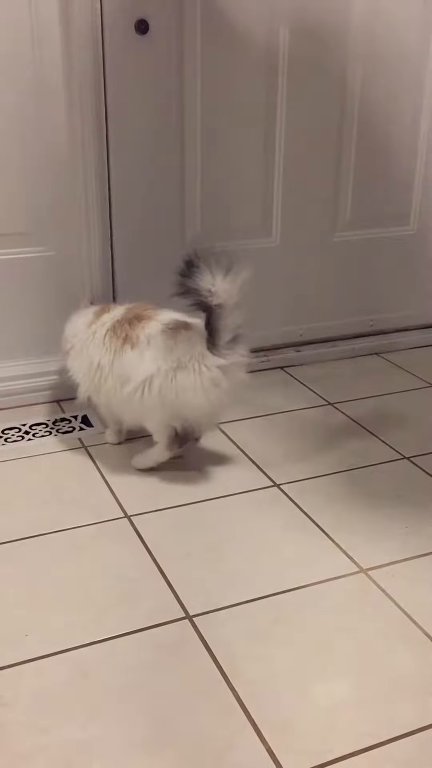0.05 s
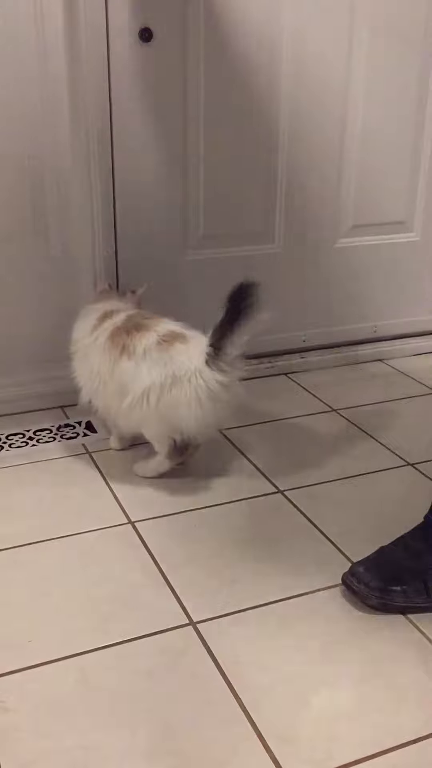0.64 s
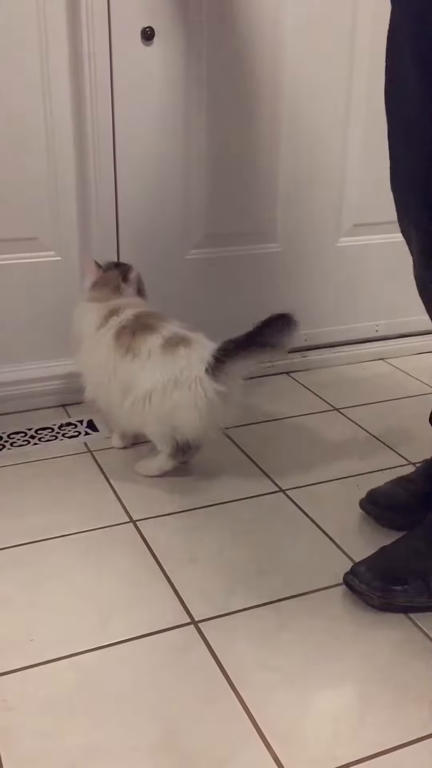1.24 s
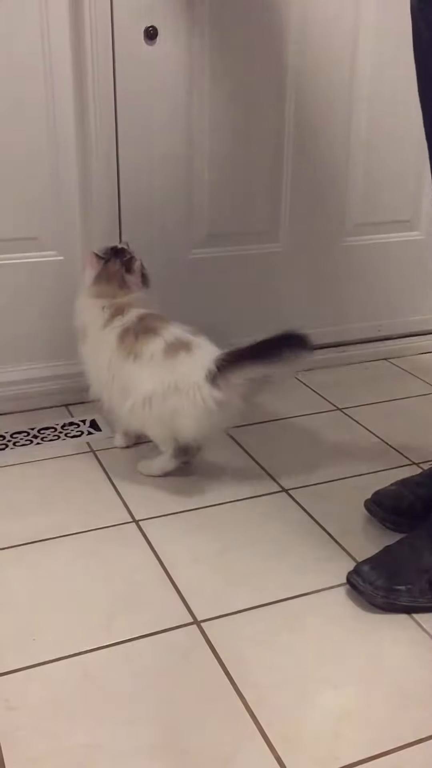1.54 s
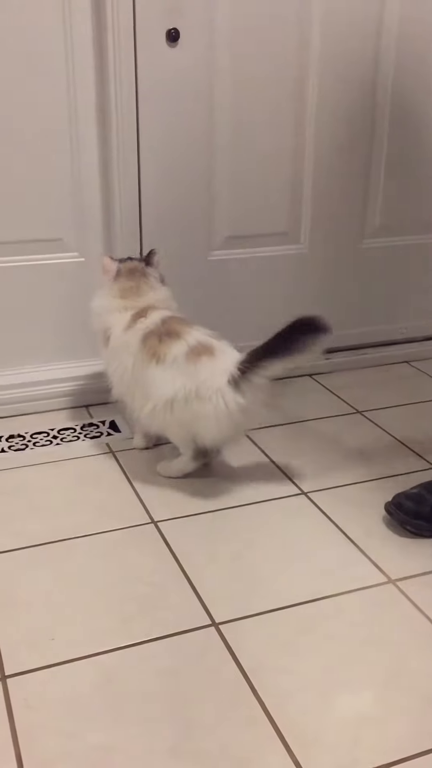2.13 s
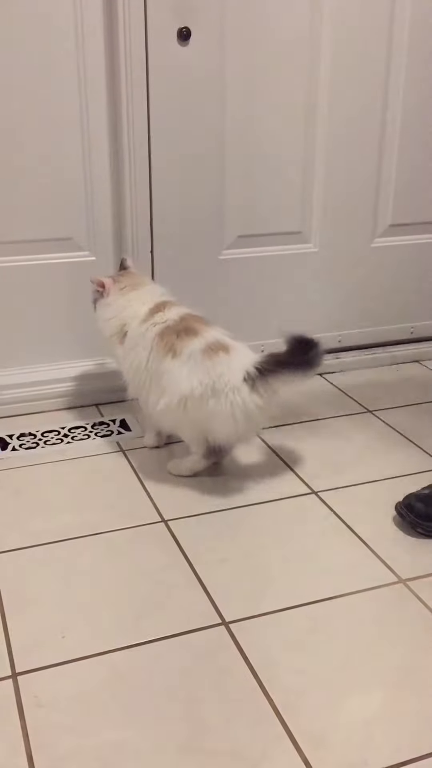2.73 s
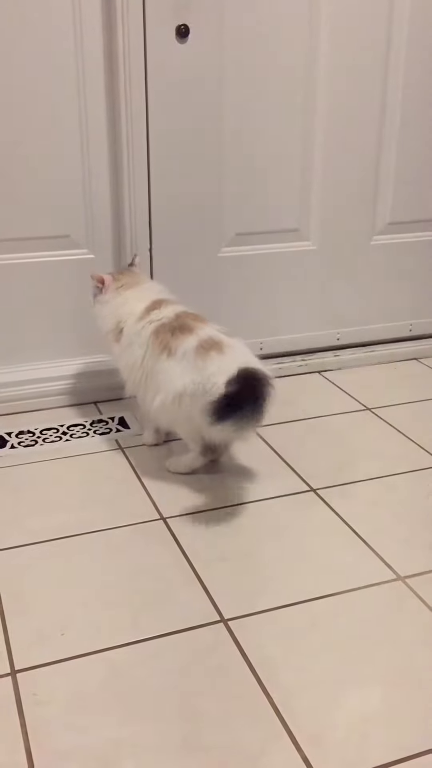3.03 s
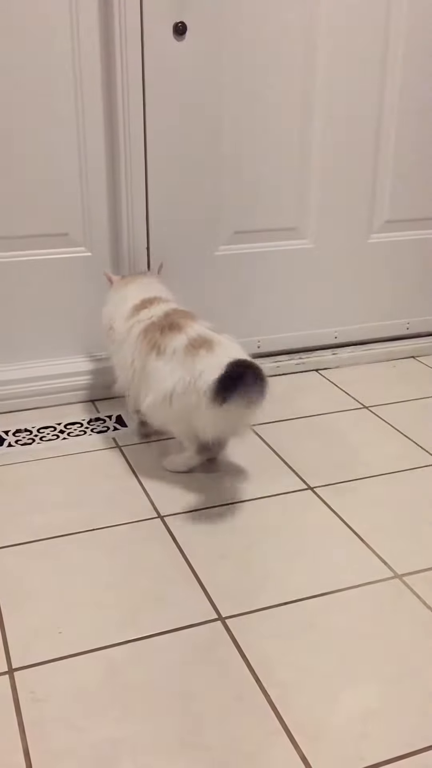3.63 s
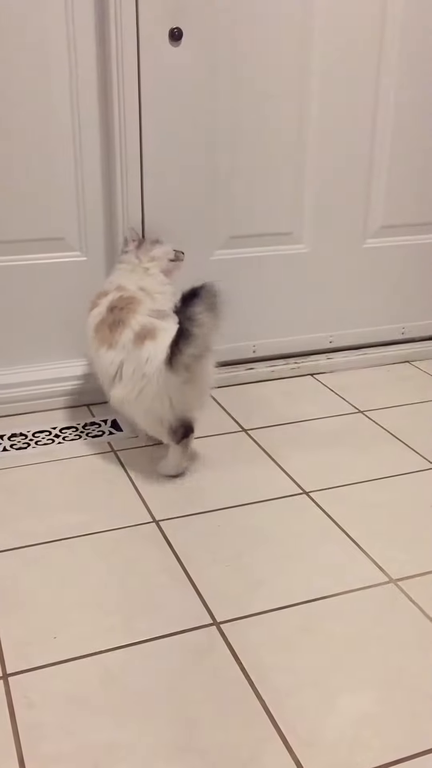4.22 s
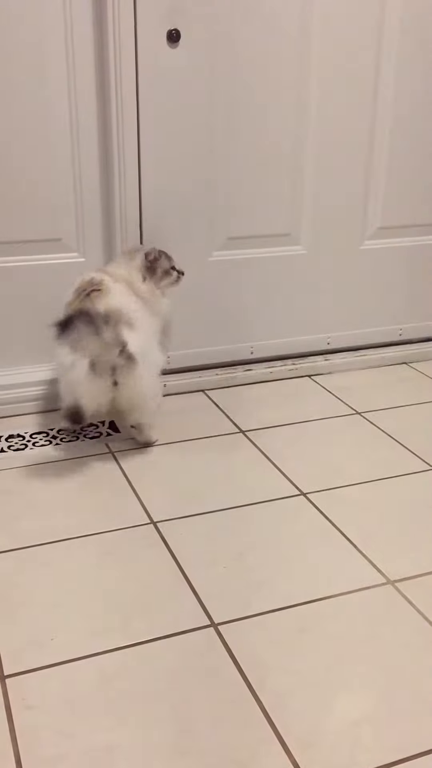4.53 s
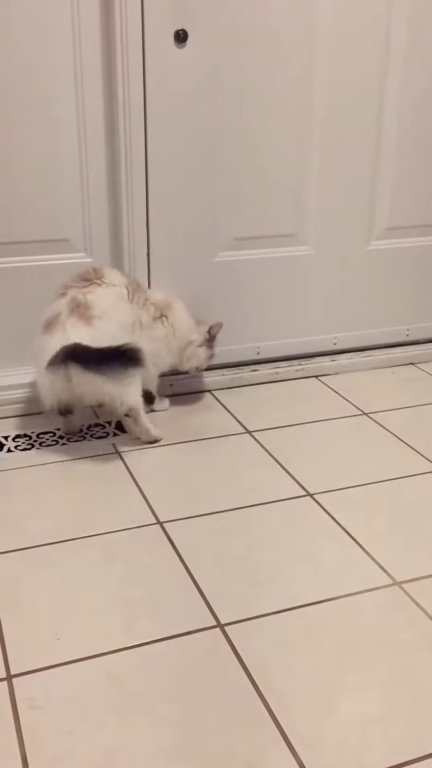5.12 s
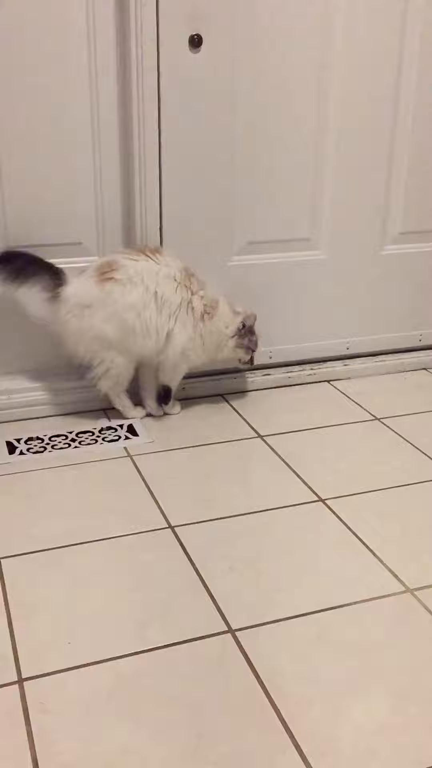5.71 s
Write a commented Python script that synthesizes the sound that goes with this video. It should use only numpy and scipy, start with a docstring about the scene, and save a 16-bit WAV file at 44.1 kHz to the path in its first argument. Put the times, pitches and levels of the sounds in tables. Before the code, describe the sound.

A wooden house door bangs hard in its frame with a low boom, followed by a few lighter knocks and a faint rub and squeak of its seal. The door knocks dully once, then the metal latch rattles and catches. After a short pause, shoes take soft, uneven steps on tile, with light scuffs and a brief rustle. It is heard from one spot in a hallway with a short echo and faint hiss.

```python
"""A door bangs in a tiled hallway

A house door bangs in its frame: the wood rings, the whole door booms, and its seal rubs and squeaks.
The door knocks dully once; its metal latch rattles and catches. Shoes step over the floor, heel then
toe, with soft scuffs and a brief rustle. Each knock echoes off the hard walls, over a faint room hiss."""
import sys
import numpy as np
from scipy import signal
from scipy.fft import rfft, irfft, next_fast_len
from scipy.io import wavfile

SR = 44100
rng = np.random.default_rng(int(sys.argv[2]) if len(sys.argv) > 2 else 0)


def to_wav(sig):
    """Store sig (one row per channel, or 1-D mono) as 16-bit WAV at the path in sys.argv[1].

    Samples outside -1..1 are clipped; the rate is SR.
    """
    pcm = np.clip(np.atleast_2d(sig), -1, 1) * 32767
    pcm = np.round(pcm).astype(np.int16)
    wavfile.write(sys.argv[1], SR, pcm.T)  # frames by channels


N = 254368
T = np.arange(SR * 3 // 4) / SR  # the time axis of one knock [s]

# Levels in the tables are relative: each source adds its own gain.
# The door hitting its frame, then the latch hitting its plate: (time [s], knock [dB], thud [dB],
# brightness [dB], thud pitch [Hz], clack pitch [Hz], chatter time [s])
FRAME_HITS = [(.212, -40, -28, -11.5, 164, 730, 0.048), (.2355, -28.5, -45, 3.5, 150, 1336, 0.063),
              (.2425, -26, -22.5, 4.5, 73, 1313, .018), (.2465, -22, -31, -0.5, 85.4, 1398, 0.014),
              (.44, -51, -44, -1, 81.6, 1226, 0.048), (.481, -55.5, -34.5, 4, 76, 1320, 0.04),
              (.603, -44, -48, -8.5, 142, 1300, 0.11), (.645, -47.5, -34, -8, 346, 870, 0.04),
              (.678, -72, -32.5, 4, 290, 920, 0.039), (.73, -67, -39, -5, 370, 1750, 0.074),
              (.745, -58.5, -44, -1, 142, 1770, .05), (.76, -58, -39, -8, 305, 1660, 0.025)]
LATCH_HITS = [(.633, -47, -40.5, 2.5, 312, 6990, 0.031), (1.3642, -45.5, -50, -2, 170, 1800, 0.0017),
              (1.367, -43, -45.5, -9, 378, 880, 0.0078), (1.377, -50.5, -68, -2.5, 92, 950, .004),
              (1.482, -53.5, -50.5, -11, 131, 1730, 0.1), (1.521, -48.5, -64, -2.5, 130, 1410, 0.13),
              (1.64, -43.5, -45, 0.5, 151, 5180, 0.064), (1.6605, -33, -31, 1, 184, 1027, .04),
              (1.675, -31, -35.5, 0.5, 211, 1380, 0.0392), (1.836, -45, -70, 0, 240, 1390, 0.057)]
# Hard shoves of the door: (time [s], level [dB])
SHOVES = [(0.254, -5.5), (0.439, -24.5), (0.733, -29.5)]
# The low tones of the whole door bending: (pitch [Hz], level [dB], swell time [s])
BENDING_TONES = [(82, -21.5, 0.027), (52, -28, 0.017), (170.4, -31.5, 0.015)]
# The ringing tones of the door and of the floor: (pitch [Hz], level [dB], time to fade 60 dB [s])
DOOR_TONES = [(290, -2.5, 0.69), (546, 2, 0.31), (937, 10, 0.2), (1090, -1.5, 0.18), (1240, -11, .26),
              (1319, 3.5, .27), (1487, 6.5, 0.24), (1430, -2.5, 0.29), (1613, 9.5, 0.12), (1664, -5.5, 0.4),
              (2320, -8.5, .25), (2350, -11, 0.32), (3680, -7.5, 0.1623), (3920, -10, 0.2),
              (4710, -10.5, 0.15)]
FLOOR_TONES = [(248.6, -11.5, 0.097), (320, -4, 0.219), (384.3, -1.5, 0.12), (573, -18, 0.29)]
# Footsteps, and one dull, step-like knock of the door at 1.34 s: (time [s], thump [dB],
# thump pitch [Hz], sole [dB], heel [dB], treble limit [Hz], rise time [s], toe gain [dB])
STEPS_AND_DOOR_KNOCK = [(.058, -50.5, 86.5, -55.5, -52.5, 1210, 0.0072, -24),
                        (1.3381, -38.5, 124, -44.5, -38, 2230, 0.00018, -16),
                        (2.732, -40, 172, -42, -55, 1450, 0.00095, -10),
                        (2.8507, -45.5, 149, -44.5, -44, 2000, 0.00024, -14.5),
                        (3.035, -59, 86, -74.5, -64, 2980, 0.0098, -14),
                        (3.442, -41.5, 161, -47, -53, 2900, 0.000064, -10),
                        (3.683, -38.5, 141, -43, -52.5, 1600, 0.00016, -5),
                        (3.85, -46, 136, -46, -52, 2050, 0.00056, -21),
                        (3.952, -35, 166, -59, -77, 600, 0.0053, -9.5),
                        (4.033, -33, 167.6, -40, -53, 1710, .0002, -7.5),
                        (4.5365, -47.5, 124, -37.5, -48.5, 2940, 0.0011, -17.5),
                        (4.83, -58, 140, -61.5, -67, 1610, 0.0034, -18),
                        (5.034, -50, 114, -44, -55.5, 1395, .00012, -19),
                        (5.686, -48, 171, -67, -84, 600, .004, -24)]
# Rubbing strokes: (start [s], length [s], level [dB])
SEAL_SLIDES = [(.02, 0.11, -61.5), (.15, 0.072, -58.5), (.235, 0.23, -45), (.625, 0.026, -50.5),
               (.87, 0.17, -68.5), (1.44, 0.19, -60.5), (1.63, 0.14, -51)]
SEAL_SQUEAKS = [(.612, 0.043, -49.5), (.742, 0.0087, -58), (1.49, .02, -55), (1.59, 0.068, -53),
                (1.845, 0.064, -51.5)]
SCUFFS = [(1.585, .05, -60), (2.86, .17, -71.5), (3.065, 0.0088, -68.5), (3.447, 0.018, -64.5),
          (3.53, 0.17, -73), (3.68, 0.3, -70), (3.99, 0.11, -68), (4.11, 0.04, -63.5),
          (4.3, 0.42, -75.5), (4.59, .015, -59.5), (4.68, 0.01, -66.5), (4.745, 0.062, -73.5),
          (4.92, 0.16, -77), (5.355, 0.019, -76), (5.5, 0.086, -70)]
CLOTH_BRUSHES = [(4.68, 0.017, -62.5), (4.75, 0.043, -66), (4.845, .015, -71.5)]
# The tone colour of each material and of the room: (frequency [Hz], level [dB])
WOOD_COLOUR = [(59, -23.5), (100, -9), (264, -15), (530, -18), (680, -21), (800, -30.5), (950, -22),
               (1400, -13), (1700, -19), (2100, -22), (3100, -30.5), (3800, -25.5), (4900, -31.5),
               (7000, -33), (15500, -53)]
METAL_COLOUR = [(47, -32), (90, 1), (190, -2.5), (400, -17), (650, -7), (950, -2), (1650, 2), (2200, -8),
                (3200, -10), (4600, -11), (6300, -7.5), (7300, -16.5), (15500, -15.5)]
FLOOR_COLOUR = [(35, -28.5), (60, 0.5), (110, -0.5), (170, 5.5), (245, -1), (335, 3.5), (480, -8.5),
                (590, -3), (760, -9), (960, -11), (1800, -19), (3000, -25.5), (9000, -26)]
SEAL_COLOUR = [(88, -39.5), (150, -5.5), (395, 5.5), (782, -5), (928, 0.5), (1490, -6), (1640, -11.5),
               (1980, -5.5), (4400, -16), (7340, -23.5), (14000, -41)]
SOLE_COLOUR = [(290, -28), (500, -8), (997, -4.5), (1090, -6), (1170, -3), (1530, -4.5), (1800, -3),
               (15500, -25)]
CLOTH_COLOUR = [(1500, -20), (4000, -8), (7000, -1.5), (11000, -9), (15500, -5)]
ROOM_COLOUR = [(15, -39), (25, -12.5), (53, -7.5), (72, -8.5), (130, -8), (200, -13), (241, -5.5),
               (269, -15), (316, -10), (352, -15), (857, -21.5), (955, -21.5), (1390, -22.5), (2520, -23.5),
               (15800, -34.5)]
# How long the hallway echoes: (frequency [Hz], time to fade 60 dB [s])
ECHO_TIMES = [(80, 0.48), (300, 0.29), (1400, 0.36), (4500, 0.27), (12000, 0.19)]
# The five bands of a knock, called thud, wood, panel, metal and tick: (low edge [Hz], high edge [Hz])
KNOCK_BANDS = [(50, 200), (200, 700), (700, 2500), (2500, 7000), (7000, 15000)]
# A typical hit's balance: (thud [dB], wood [dB], panel [dB], metal [dB], tick [dB])
BANG_BALANCE, LATCH_BALANCE = [-6.5, -2, 0.5, -9.5, -26.5], [-4.5, 0.5, -1.5, 0, -13.5]


def door():
    """Wood bangs on wood, then the latch rides over its plate and catches."""
    bangs = door_hits(FRAME_HITS, WOOD_COLOUR, BANG_BALANCE, ring_db=-9.5, clack_db=-0.5,
                      clack_s=0.031, chatter_db=18, echo_db=-1, thud_gain_db=0, swell_s=0.008)
    latch = door_hits(LATCH_HITS, METAL_COLOUR, LATCH_BALANCE, ring_db=-29, clack_db=0,
                      clack_s=0.011, chatter_db=5, echo_db=-3.5, thud_gain_db=8.5, swell_s=0.0088)
    return amp(-6) * bangs + amp(-4.5) * latch


def door_hits(hits, colour, balance, ring_db, clack_db, clack_s, chatter_db, echo_db,
              thud_gain_db, swell_s):
    """Each hit rings the door; a heavy one adds bass, a bright one adds metallic treble."""
    out = np.zeros(N)
    for start, knock_db, thud_db, bright_db, thud_hz, clack_hz, chatter_s in hits:
        knock = unit_energy(hallway(coloured(contact(chatter_s, chatter_db), colour), echo_db))
        # the struck spot has a short tone of its own
        clack = unit_energy(hallway(np.sin(2 * np.pi * clack_hz * T) * fade(T, clack_s), echo_db=-10))
        hit = knock + amp(clack_db) * clack + amp(ring_db) * ringing(DOOR_TONES)
        hit = soft_start(hit, 0.033 * chatter_s)  # a glancing hit chatters longer and rises more slowly
        thud = amp(thud_gain_db + thud_db) * hallway(thump(thud_hz, swell_s), echo_db=-11)
        heavy_db = thud_db - knock_db
        lift_db = np.array([0.97 * heavy_db, 0.12 * heavy_db, 0, bright_db, 2 * bright_db])
        add(out, start, balanced(hit, knock_db + lift_db + balance) + thud)
    return out


def door_boom():
    """The whole door bends to and fro after a shove, until the seal grips and stills it."""
    out = np.zeros(N)
    grip = 1 / (1 + (T / 0.0749) ** 6)
    for start, db in SHOVES:
        bend = sum(amp(db + tone_db + 5.5) * thump(hz, swell) for hz, tone_db, swell in BENDING_TONES)
        add(out, start, hallway(bend * grip, echo_db=-21))
    return out


def steps_and_door_knock():
    """Each step lands on the heel, then the lower, softer toe; one dull door knock is made alike."""
    out = np.zeros(N)
    for start, thump_db, hz, sole_db, heel_db, limit_hz, rise_s, toe_db in STEPS_AND_DOOR_KNOCK:
        add(out, start, footfall(thump_db, hz, sole_db, heel_db, limit_hz, rise_s))
        toe = footfall(thump_db, 0.76 * hz, sole_db - 5.5, heel_db - 5.5, limit_hz, rise_s=0.011)
        add(out, start + 0.046, amp(toe_db) * toe)
    return out


def footfall(thump_db, hz, sole_db, heel_db, limit_hz, rise_s):
    """The heel knocks, the sole slaps and the body's weight thumps the floor."""
    slap = unit_energy(hallway(coloured(contact(0.025, chatter_db=1.5), FLOOR_COLOUR), echo_db=-0.5))
    ring = amp(-12) * soft_start(ringing(FLOOR_TONES), 0.00056)
    knock = balanced(soft_start(slap + ring, rise_s), [thump_db - 6, sole_db, heel_db])
    knock = butter(knock, limit_hz, 'lowpass', order=6)  # softer rubber gives less treble
    swell_s = 0.009 * (150 / hz) ** 1.2  # lower thumps build up more slowly
    weight = amp(thump_db + 5) * hallway(thump(hz, swell_s), echo_db=-17.5)
    return amp(-1.5) * (weight + knock)


def door_seal(squeak_hz=1692, spread_hz=180):
    """The seal drags on the frame and squeaks briefly as it slips."""
    drag = strokes(SEAL_SLIDES, attack_s=0.027, sag_s=0.24, release_s=0.028) * noise(SEAL_COLOUR)
    squeal = filtered(rng.standard_normal(N), lambda hz: 1 / (1 + ((hz - squeak_hz) / spread_hz) ** 4))
    squeaks = strokes(SEAL_SQUEAKS, attack_s=0.012, sag_s=0.062, release_s=0.014) * unit_power(squeal)
    return amp(-1.5) * drag + squeaks


def scuffs():
    """Short brushing drags: the first, near 1.59 s, is the seal dragging as the latch catches; the rest are
    soles brushing over the tiles."""
    return amp(4) * strokes(SCUFFS, attack_s=0.015, sag_s=0.51, release_s=0.046) * noise(SOLE_COLOUR)


def rustle():
    """Light brushes of cloth or fur make short, high hisses."""
    return strokes(CLOTH_BRUSHES, attack_s=0.018, sag_s=0.18, release_s=0.03) * noise(CLOTH_COLOUR)


def hallway(x, echo_db):
    """The direct sound plus a dense echo from the hard walls."""
    hz, t, spectrum = signal.stft(rng.standard_normal(len(T)), SR, nperseg=256)
    spectrum = spectrum * fade(t, curve(ECHO_TIMES, hz)[:, None])
    echo = signal.istft(spectrum, SR, nperseg=256)[1][:len(T)]
    echo *= 1 - np.exp(-T / 0.0022)
    return x + amp(echo_db) * signal.fftconvolve(x, unit_energy(echo))[:len(T)]


def room_tone():
    """The faint hiss and low drone of the house."""
    return amp(-67.5) * noise(ROOM_COLOUR)


def contact(chatter_s, chatter_db):
    """One sharp push, then a chatter as the surfaces settle."""
    chatter = rng.standard_normal(len(T)) * amp(2.55 * rng.standard_normal(len(T)))
    force = amp(chatter_db) * unit_energy(chatter * fade(T, chatter_s))
    force[0] += 1
    return unit_energy(force)


def ringing(tones):
    """Each hit wakes the same fading tones at new strengths."""
    ring = np.zeros(len(T))
    for hz, db, fade_s in tones:
        strength = amp(db + rng.normal(0, 3.45))
        ring += strength * fade(T, fade_s) * np.sin(2 * np.pi * (hz * T + rng.random()))
    return unit_energy(ring)


def thump(hz, swell_s):
    """A low tone that swells and dies away."""
    age = T / max(swell_s, 0.002)
    return np.sin(2 * np.pi * hz * T) * (age * np.exp(1 - age)) ** 2


def soft_start(x, rise_s):
    """A glancing or rolling contact builds up instead of cracking."""
    return x * (1 - np.exp(-T / max(rise_s, 1e-5))) ** 2


def strokes(rows, attack_s, sag_s, release_s):
    """The loudness of rubbing: each stroke grips quickly, sags as it slows and fades when it stops."""
    gain = np.zeros(N)
    for start, length, db in rows:
        t = np.arange(N) / SR - start
        attack = np.maximum(-t, 0) / attack_s
        sag = np.clip(t, 0, length) / sag_s
        release = np.maximum(t - length, 0) / release_s
        gain = np.hypot(gain, amp(db) * np.exp(-attack - sag - release))
    return gain


def balanced(x, band_db):
    """Steer each band of a knock toward the energy of 30 ms of sound at the given level."""
    power = np.abs(rfft(x)) ** 2 * 2 / len(x)
    hz = np.fft.rfftfreq(len(x), 1 / SR)
    colour = []
    for (low, high), db in zip(KNOCK_BANDS, band_db):
        band_power = power[(hz > low) & (hz < high)].sum() / (0.03 * SR)
        colour.append((np.sqrt(low * high), db - 10 * np.log10(band_power)))
    return coloured(x, colour)


def coloured(x, colour):
    """Give a hit a tone colour, with nothing sounding ahead of it (a minimum-phase filter)."""
    def response(hz):
        cepstrum = irfft(np.log(amp(np.maximum(curve(colour, hz), -100))))
        half = len(cepstrum) // 2
        cepstrum[1:half] *= 2
        cepstrum[half + 1:] = 0
        return np.exp(rfft(cepstrum))
    return filtered(x, response)


def noise(colour):
    """Steady noise with a tone colour."""
    return unit_power(filtered(rng.standard_normal(N), lambda hz: amp(curve(colour, hz))))


def filtered(x, response):
    """Scale each frequency by response(hz)."""
    size = next_fast_len(len(x) + 8192)
    return irfft(rfft(x, size) * response(np.fft.rfftfreq(size, 1 / SR)), size)[:len(x)]


def butter(x, hz, kind, order):
    """Cut the treble ('lowpass') or the bass ('highpass')."""
    return signal.sosfilt(signal.butter(order, hz, kind, fs=SR, output='sos'), x)


def curve(points, hz):
    """Join the points of a table along a pitch scale."""
    frequencies, values = np.transpose(points)
    return np.interp(np.log(hz + 1), np.log(frequencies + 1), values)


def fade(t, fade_s):
    """Fall by 60 dB in fade_s seconds."""
    return np.exp(-np.log(1000) * t / np.maximum(fade_s, 1e-3))


def amp(db):
    """Turn decibels into a gain."""
    return 10 ** (np.asarray(db) / 20)


def unit_power(x):
    """Scale to an average power of 1."""
    return x / np.sqrt(np.mean(x ** 2) + 1e-20)


def unit_energy(x):
    """Scale to a total energy of 1."""
    return x / np.linalg.norm(x)


def add(track, start_s, x):
    """Mix a sound in at its start time."""
    start = max(round(start_s * SR), 0)
    track[start:start + len(x)] += x[:N - start]


def scene():
    """Everything in the hallway, heard from one spot."""
    knocks = door() + door_boom() + steps_and_door_knock()
    return (knocks + door_seal() + scuffs() + rustle() + room_tone())[None]


def record(dry):
    """Cut the deepest bass and the highest treble."""
    return filtered(butter(dry[0], 30, 'highpass', order=4), lambda hz: hz < 15850)[None]


dry = scene()
out = record(dry)
to_wav(out)
```